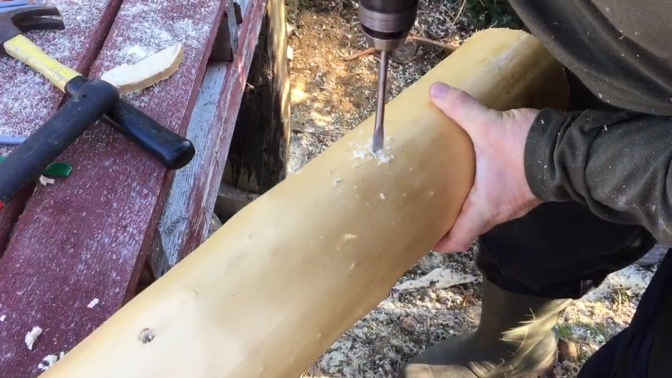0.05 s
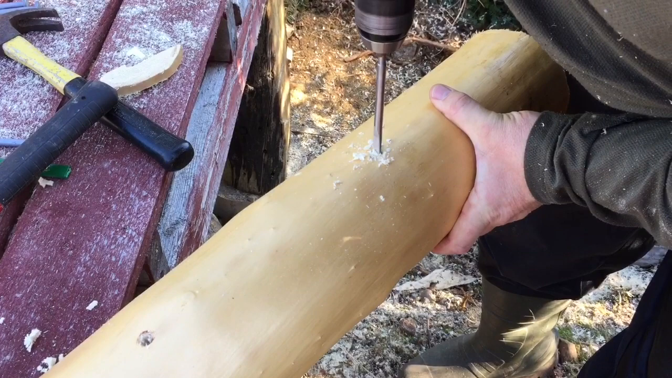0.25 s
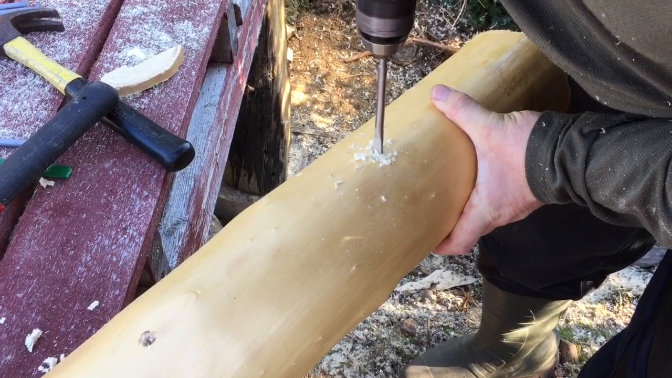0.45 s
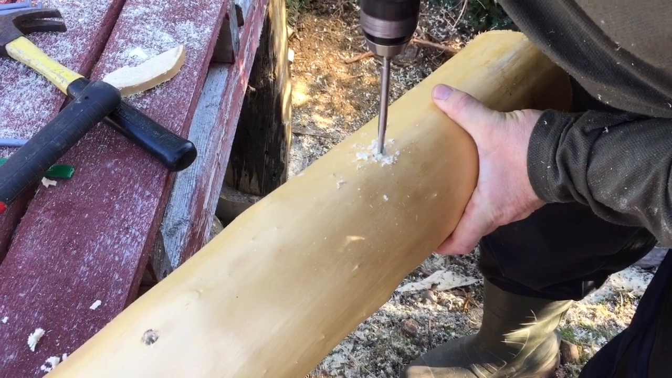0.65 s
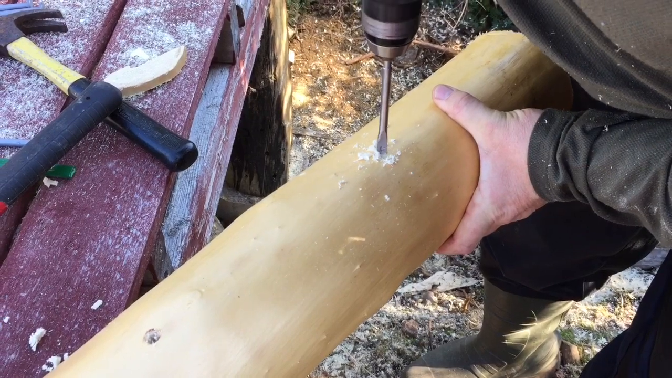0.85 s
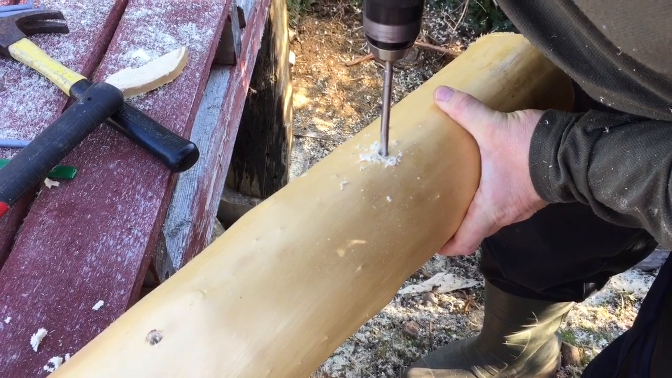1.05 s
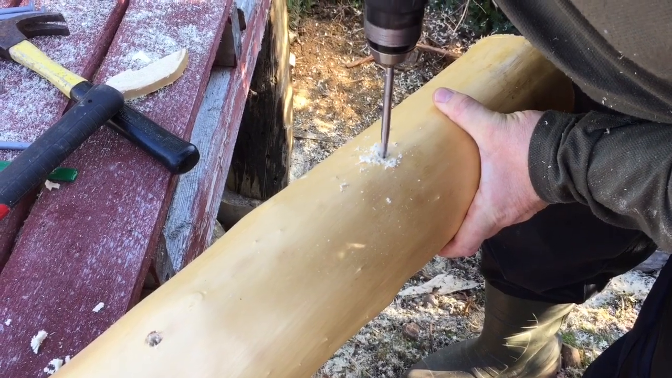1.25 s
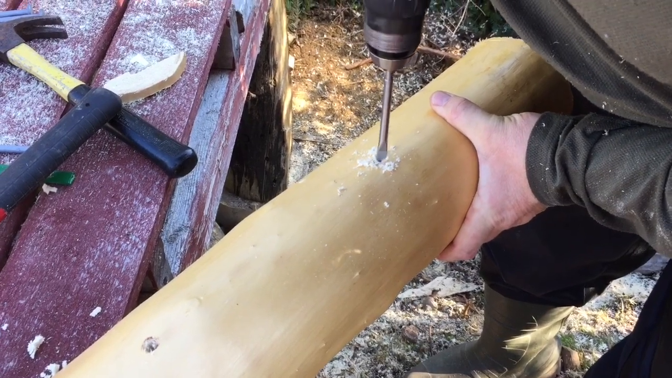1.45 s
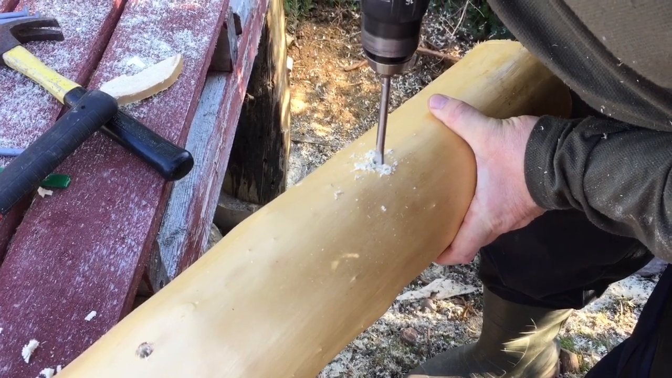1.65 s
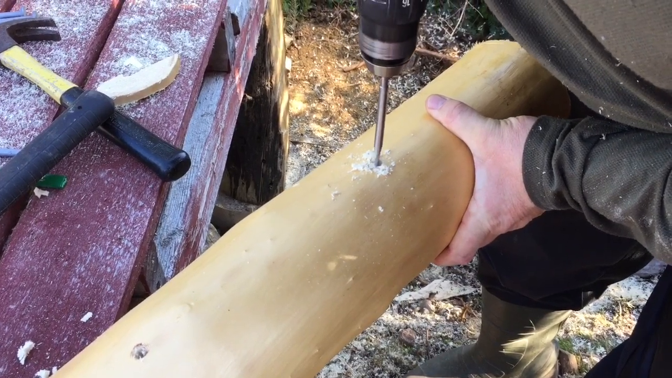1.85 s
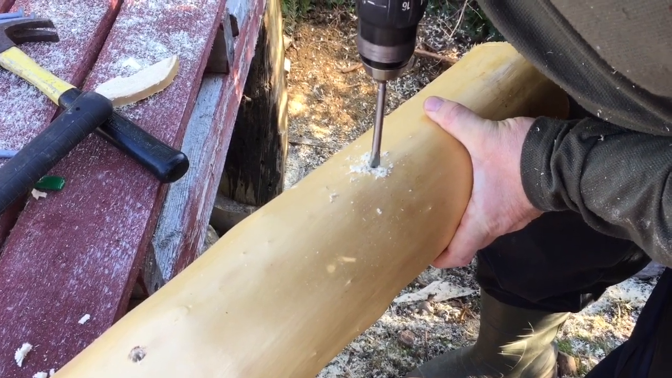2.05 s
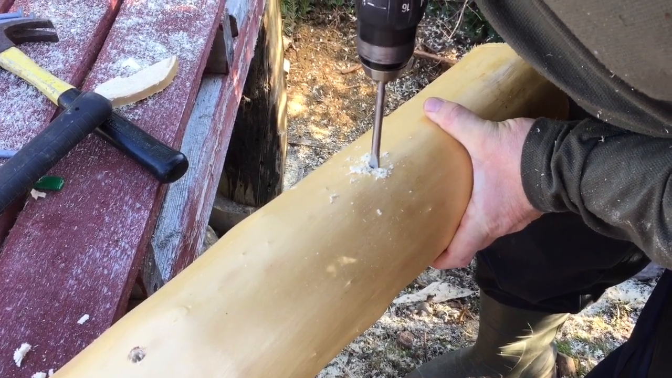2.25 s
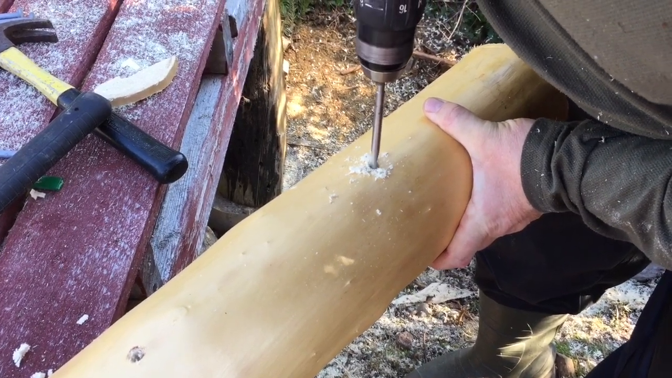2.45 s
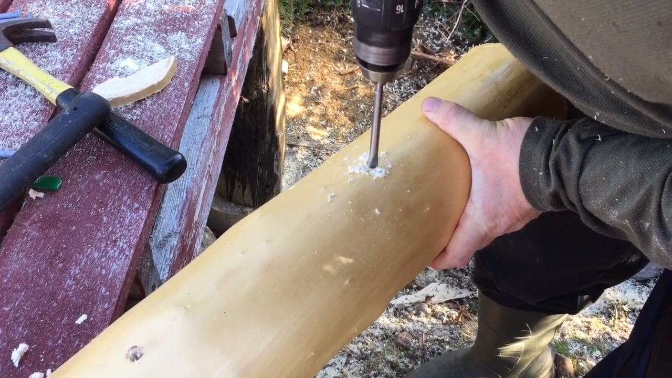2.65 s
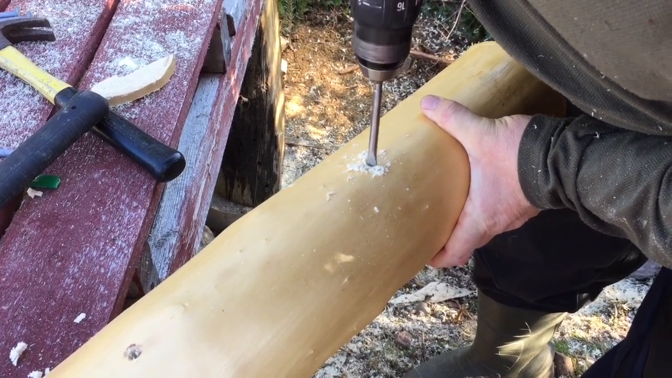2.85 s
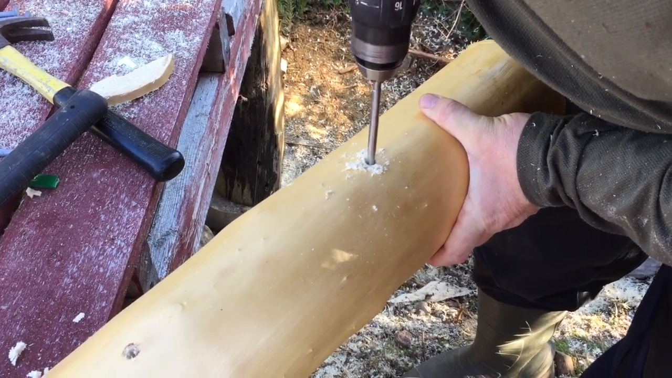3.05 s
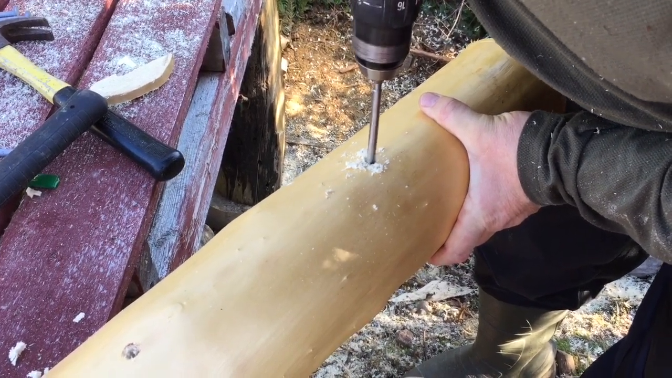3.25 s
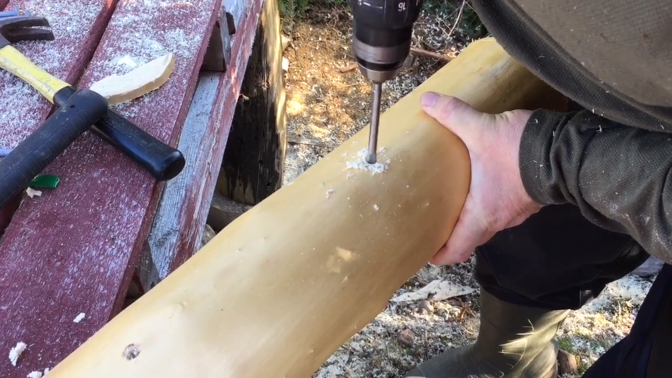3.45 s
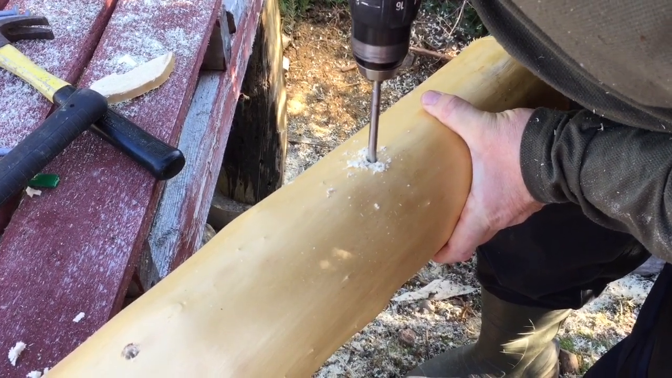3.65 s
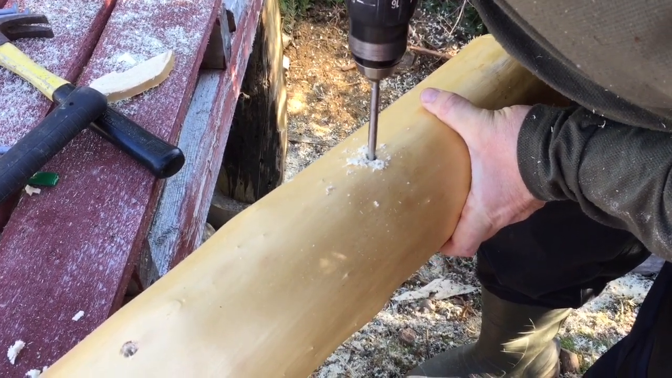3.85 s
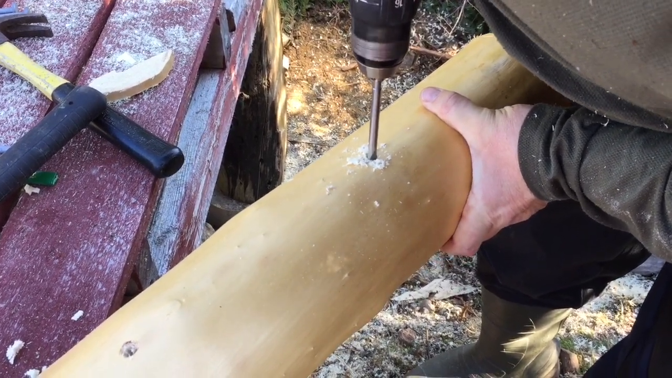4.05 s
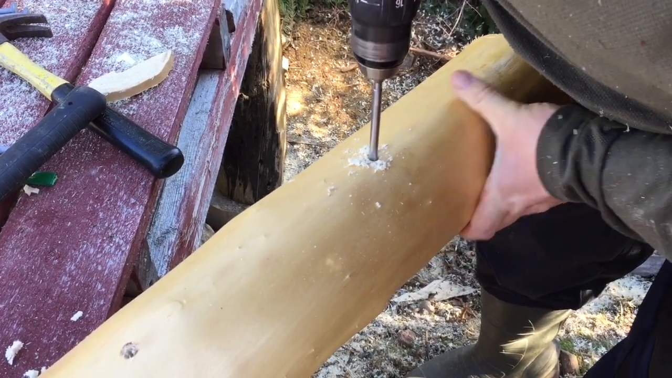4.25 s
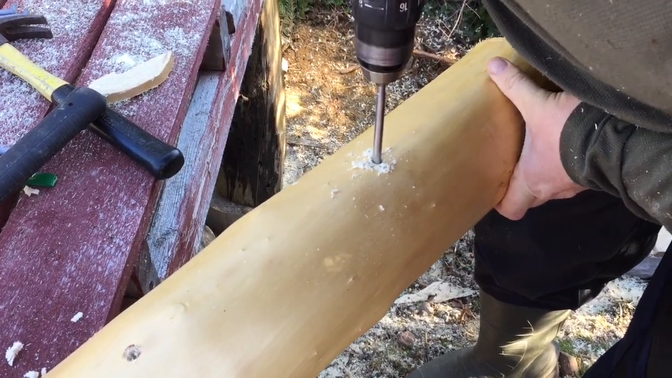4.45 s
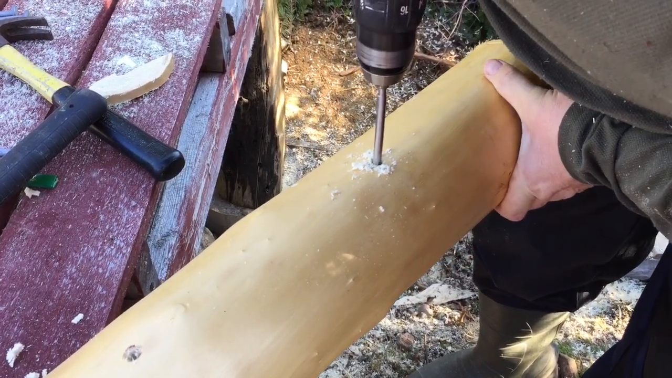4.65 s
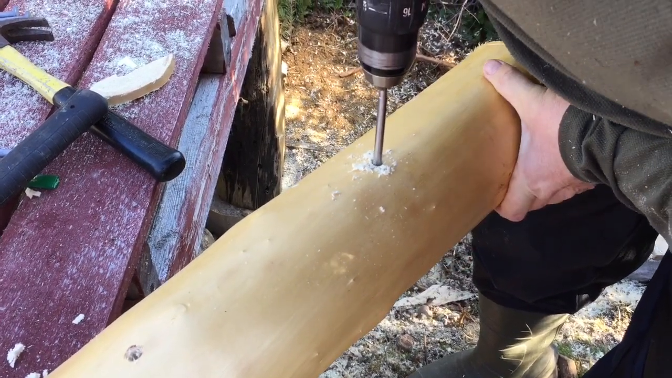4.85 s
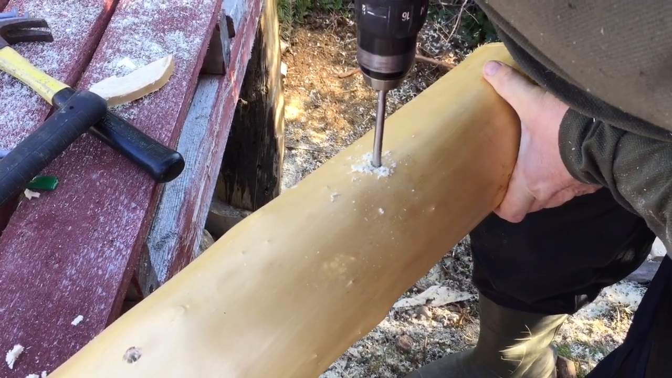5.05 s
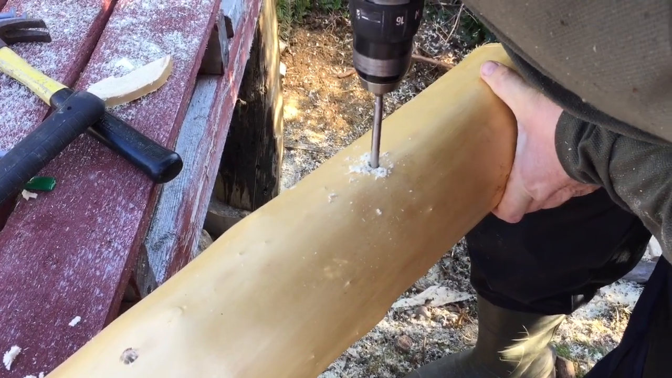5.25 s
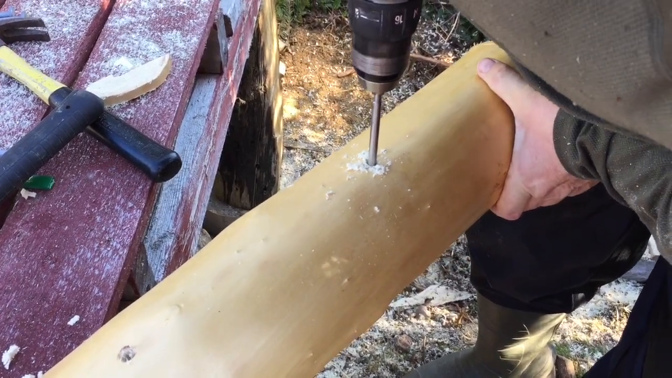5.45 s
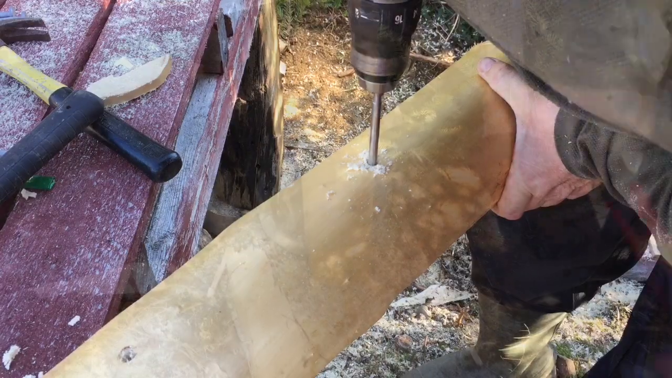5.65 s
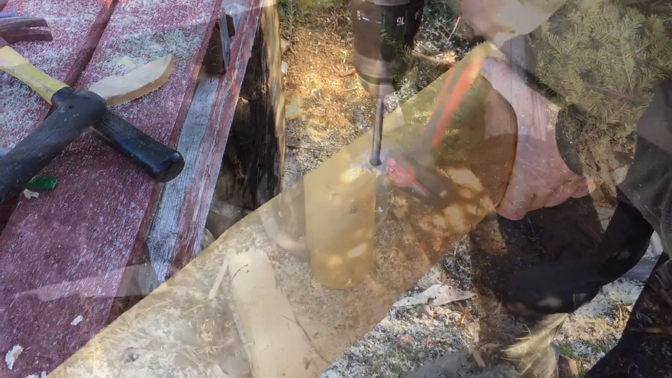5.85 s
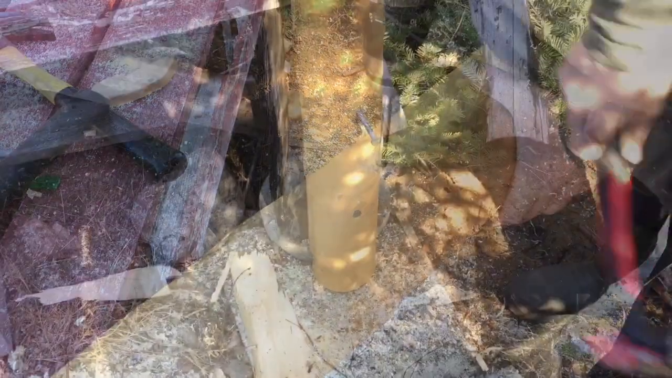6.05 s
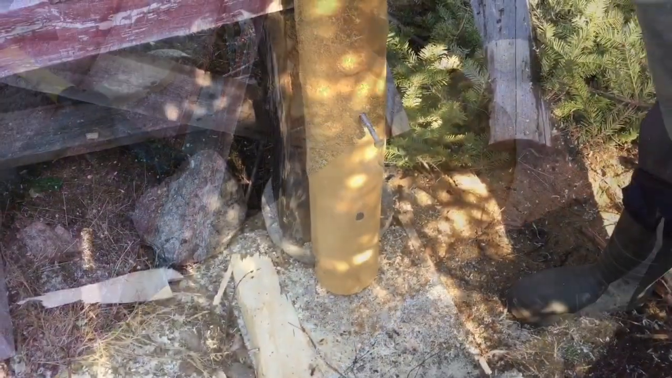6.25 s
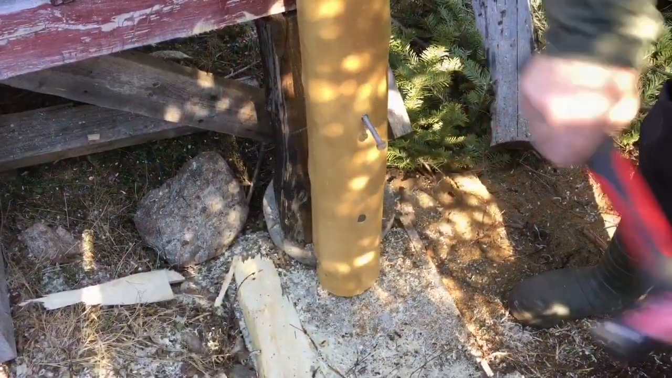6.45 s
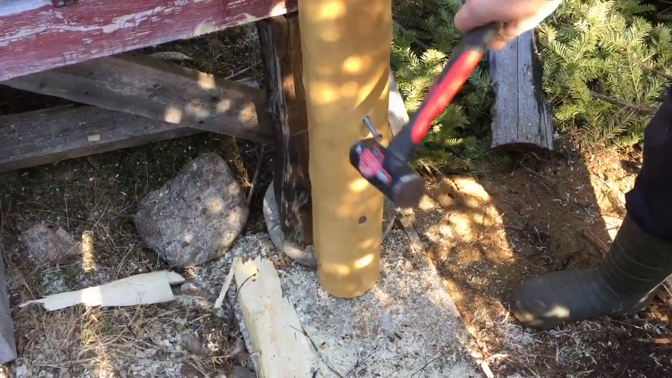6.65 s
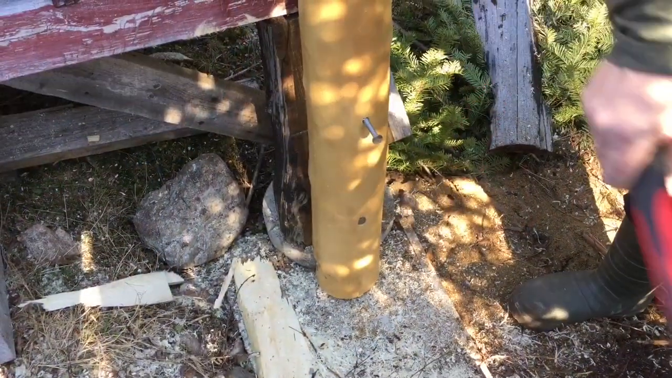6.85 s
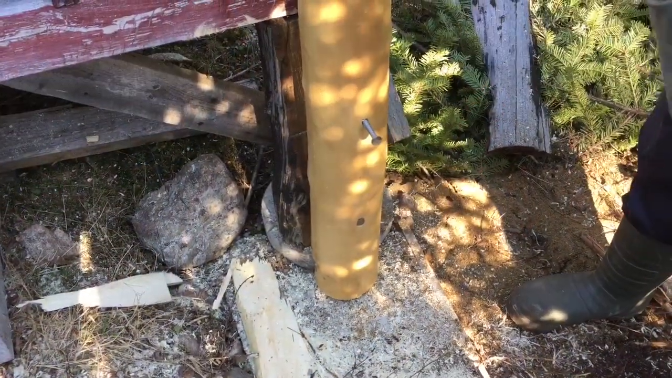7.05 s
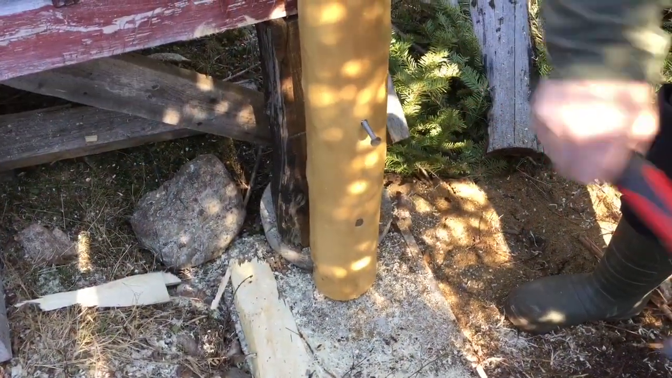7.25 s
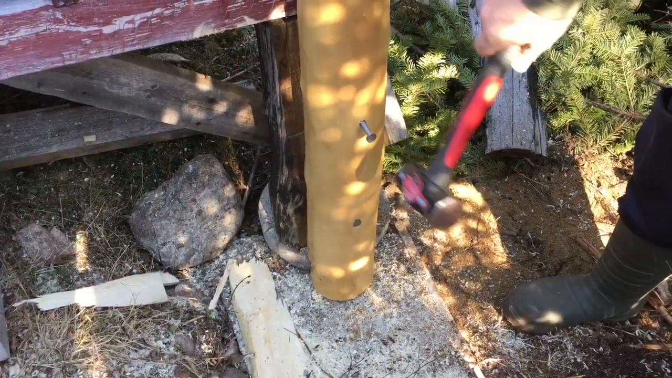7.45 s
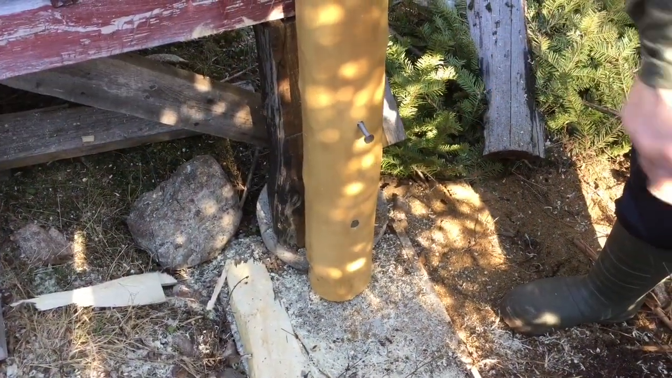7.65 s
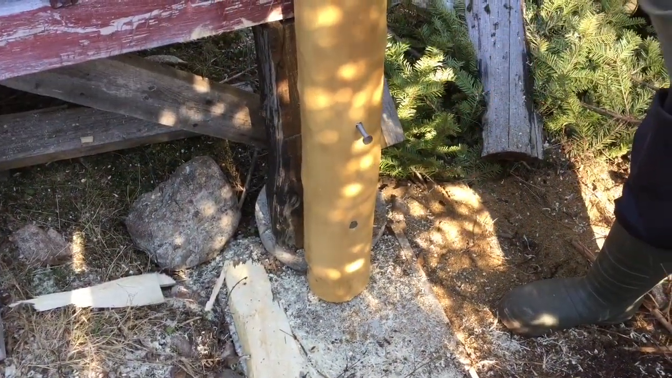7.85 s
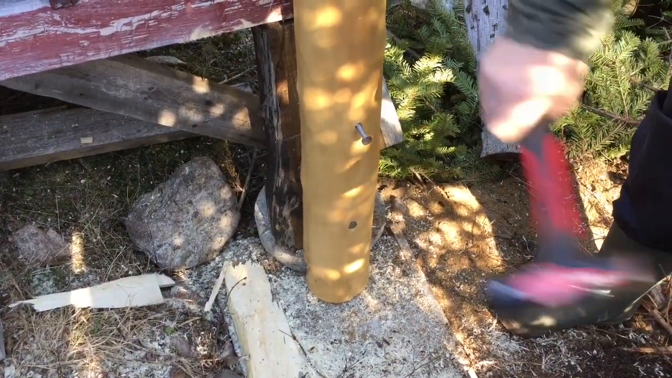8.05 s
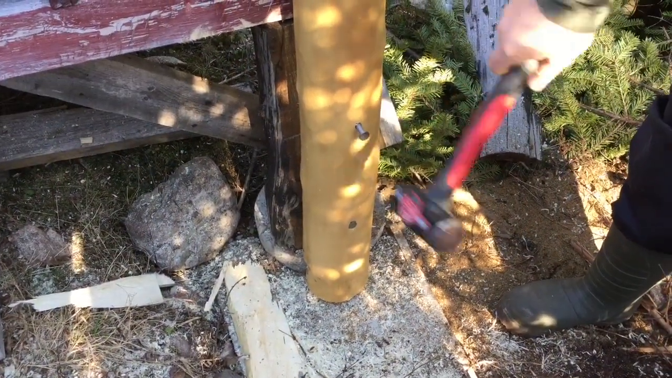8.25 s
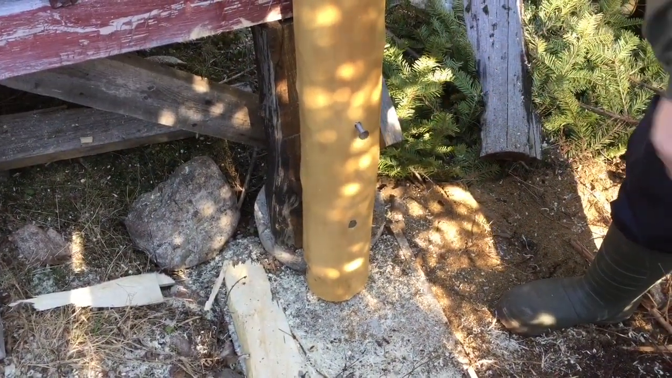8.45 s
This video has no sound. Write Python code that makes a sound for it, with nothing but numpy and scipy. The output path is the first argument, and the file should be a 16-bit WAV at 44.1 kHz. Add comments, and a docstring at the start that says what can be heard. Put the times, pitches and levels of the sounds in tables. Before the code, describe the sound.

An electric drill runs continuously, bright and whirring, its pitch sagging slightly as the hole deepens. Low wind buffets come early; later, chirping squeaks and bright rasps come in rapid bursts. It crossfades into slow, regular hammer blows on a spike in a pole, hard and overloading the close microphone, with short dry decays, soft open-air rush and slight cloth rustle.

```python
"""We first hear a cordless drill boring a wooden pole outdoors, with puffs of wind on the microphone. Rotor and
gear tones lie over brush and gear noise; deep in the hole the bit squeaks and rasps. The drill fades out as the
scene changes to a sledge hammer driving a steel spike into the standing pole: each blow is noise for the crack
plus dying tones for pole and spike. Shaped noise makes the distant rush and cloth. Sound that overloads the
microphone makes it turn its gain down for a while."""
import sys
import numpy as np
from scipy import signal
from scipy.fft import rfft, irfft, next_fast_len
from scipy.io import wavfile
from scipy.ndimage import uniform_filter1d

SR = 44100
rng = np.random.default_rng(int(sys.argv[2]) if len(sys.argv) > 2 else 0)


def int16_out(signal):
    """Quantize to a 16-bit WAV file."""
    q = np.round(np.clip(np.atleast_2d(signal).T, -1, 1) * 32767)
    wavfile.write(sys.argv[1], SR, q.astype(np.int16))


N = 375291
TIME = np.arange(N) / SR


def from_db(db):
    """Turn decibels into gain."""
    return 10 ** (np.asarray(db) / 20)


def rms_one(x):
    """Scale to an average strength (rms) of 1."""
    return x / np.sqrt(np.mean(x ** 2) + 1e-20)


def in_time(rows):
    """Join the rows of a table by straight lines in time, one curve per column."""
    s, *columns = np.transpose(rows)
    return [np.interp(TIME, s, column) for column in columns]


def at_hz(points, hz):
    """Read the columns of a spectrum table at any frequency, on a logarithmic frequency scale."""
    table_hz, *columns = np.transpose(points)
    return [np.interp(np.log(hz), np.log(table_hz), column) for column in columns]


def filtered(x, order, edges_hz, kind):
    """Pass a sound through a Butterworth filter, which keeps only part of its pitch range."""
    return signal.sosfilt(signal.butter(order, edges_hz, kind, fs=SR, output="sos"), x)


def drift(rate_hz):
    """Slow random wandering with spread 1: smoothed noise, made at every 40th sample."""
    r = np.exp(-2 * np.pi * rate_hz * 40 / SR)
    white = rng.standard_normal(N // 40 + 2002)
    slow = signal.lfilter([1], [1, -2 * r, r * r], white)[2000:]  # skip the filter's start
    return np.interp(np.arange(N) / 40, np.arange(len(slow)), rms_one(slow))


def bands(length):
    """Cut noise into third-octave bands, given as (centre Hz, noise)."""
    edges = 90 * 2 ** np.arange(0, 7.7, 1 / 3)
    white = rng.standard_normal((2, length))  # neighbouring bands use different noise
    for k, (low, high) in enumerate(zip(edges, edges[1:])):
        yield np.sqrt(low * high), filtered(white[k % 2], 2, [low, high], "band")


def coloured(spectrum, patchy_db, more=0):
    """Shape noise, each band flickering on its own, plus any extra sound by a spectrum; rms 1."""
    flickering = sum(from_db(patchy_db * drift(18)) * noise for hz, noise in bands(N))
    flat = rms_one(flickering) + more
    size = next_fast_len(N)
    gain = from_db(at_hz(spectrum, np.fft.rfftfreq(size, 1 / SR) + 1)[0])
    return rms_one(irfft(rfft(flat, size) * gain, size)[:N])


# tone colour of the distant rush: (frequency [Hz], relative level [dB per Hz])
AIR_SPECTRUM = [(59, -37), (100, -22.5), (166, -17.5), (228, -15), (479, -16.5), (830, -15), (1440, -7.5),
                (1850, -11), (2060, -12), (2770, -20), (6500, -34.5), (8000, -46.5), (15700, -57.5)]
# loudness of the distant rush: (time [s], level [dB])
RUSH_LEVEL = [(5.6, -73), (6.3, -61), (6.6, -50.5), (7.2, -51), (7.7, -49), (8.0, -48), (8.5, -49.5)]
# sleeve and boot shifting: (time of the middle [s], half length [s], level [dB])
CLOTH_RUSTLES = [(7.828, 0.011, -62), (7.864, 0.029, -57), (7.96, 0.12, -64)]


def surroundings():
    """Broad shaped noise is the distant rush; short swells of high noise are rustling clothes."""
    rush = from_db(in_time(RUSH_LEVEL)[0]) * coloured(AIR_SPECTRUM, patchy_db=-1.5)
    swells = sum(from_db(db) * np.exp(-((TIME - s) / half) ** 2) for s, half, db in CLOTH_RUSTLES)
    cloth = rms_one(filtered(rng.standard_normal(N), 2, [1800, 4500], "band"))
    return rush + swells * cloth * from_db(2.6 * drift(60))


# gusty low rumble of the wind: (time [s], level [dB])
WIND_RUMBLE = [(0, -45), (.3, -57), (.5, -45), (.75, -42), (.85, -78), (1.5, -78), (1.65, -47), (1.8, -76),
               (2.5, -58), (3.1, -61.5), (3.6, -75.5), (4.46, -60), (4.7, -72), (5.0, -60), (5.3, -52),
               (6.1, -46), (6.3, -63), (8.5, -57.5)]
# strong puffs on the microphone: (time of the middle [s], half length [s], level of the rumble [dB])
WIND_PUFFS = [(0.038, .01, -47), (0.15, 0.0088, -44), (0.334, 0.019, -44), (0.454, 0.023, -28),
              (0.658, .009, -27.5), (0.708, 0.012, -30.5), (.76, .009, -34), (1.575, .014, -46),
              (2.593, 0.021, -53), (5.358, .012, -39), (5.574, .013, -43), (5.712, 0.018, -43.5),
              (8.049, 0.0093, -51)]


def wind(lumpy_db=4.5):
    """Lumpy, gusty low noise, and puffs of evenly strong rumble; strong puffs reach higher in pitch."""
    low = filtered(rng.standard_normal(N), 3, [42, 120], "band")
    gusty = from_db(in_time(WIND_RUMBLE)[0]) * rms_one(low * from_db(lumpy_db * drift(6.76)))
    rumble = low / np.sqrt(uniform_filter1d(low ** 2, size=SR // 40))  # even out over 25 ms
    swells = sum(from_db(db) * np.exp(-((TIME - s) / half) ** 2) for s, half, db in WIND_PUFFS)
    puffs = rumble * swells
    # squaring the wave bends it, which adds overtones, most in strong puffs
    harsh = filtered(puffs * np.abs(puffs), 2, 90, "high")
    return gusty + puffs + 15 * harsh


# hammer on spike: (time [s], crack level [dB], crack brightness [dB per octave], then levels of
# the tones: thud of pole and ground [dB], hollow body [dB], knock of the wood [dB],
# upper knock [dB], steel [dB]); the highest tone follows the crack
HAMMER_BLOWS = [(5.9612, -16.5, 0, -15, -11, -13.5, -9.5, -23), (6.697, -4.5, 0.5, -2.5, -3, 4.5, 0.5, -1),
                (7.4748, -3, 0, 4.5, 7.5, -7, -2.5, 6.5), (8.2405, -1, 0.5, 3, 3.5, -0.5, 5.5, -1.5)]
# tones of pole and spike: (frequency [Hz], relative level [dB], time to fall by 60 dB [s])
POLE_TONES = [(64, -14.5, 0.22), (114, 6, 0.055), (187.7, -3.5, 0.087), (280, -18, 0.15),
              (377, -13.5, 0.054), (436, -15.5, 0.1), (610, -15, 0.16), (781, -15.5, 0.12), (945, -10, .13),
              (1445, -11.5, 0.067), (1760, -5, 0.05), (1890, -13.5, 0.088), (2060, -25, 0.16),
              (2340, -5.5, 0.032), (2480, -26.5, 0.11), (3500, -1.5, 0.018), (3767, -6.5, 0.026),
              (5415, -2, 0.02), (6170, -4, 0.024), (11300, -39, .22)]
# borders between the groups of tones, from thud to steel and the highest: frequency [Hz]
PART_EDGES_HZ = [250, 550, 1200, 3000, 8000]
# crack and its scatter from fence and trees: (frequency [Hz], relative crack level [dB],
# crack time to fall by 60 dB [s], relative scatter level [dB], scatter time to fall by 60 dB [s])
CRACK_BANDS = [(150, -12.5, 0.13, -19.5, 0.27), (507, -20, 0.032, -22, 0.22), (1200, -22, 0.1, -30.5, 0.28),
               (2440, 3.5, 0.022, -24, 0.2), (4000, -0.5, 0.027, -26.5, 0.22), (5900, 0, 0.011, -29, 0.21),
               (9050, -10.5, .025, -29, .12), (15000, -11.5, 0.03, -35, .12)]


def hammer(swell=0.73, after_db=-28, after_t60=0.11):
    """Each blow: a bright crack dying band by band, its scatter, and the tones of pole and spike."""
    out, length = np.zeros(N + SR), SR // 2
    t = np.arange(length) / SR
    for s, crack_db, bright_db, *parts_db in HAMMER_BLOWS:
        blow = np.zeros(length)
        for hz, noise in bands(length):
            db, t60, scatter_db, scatter_t60 = at_hz(CRACK_BANDS, hz)
            band_gain = from_db(crack_db + bright_db * np.log2(hz / 3000))
            dying = from_db(db - 60 * t / t60) + from_db(scatter_db - 60 * t / scatter_t60)
            blow += rms_one(noise) * band_gain * dying
        for hz, db, t60 in POLE_TONES:
            # the whole pole follows the spike a little later
            late = np.maximum(t - .0015 * (hz < PART_EDGES_HZ[0]), 0)
            part_db = [*parts_db, crack_db][np.searchsorted(PART_EDGES_HZ, hz)]
            strength = from_db(db + part_db + rng.normal(0, 1.2))
            dying = from_db(-60 * late / t60)
            if hz > PART_EDGES_HZ[-2]:  # the steel rings on faintly once the hammer has left it
                dying = dying + from_db(after_db - 60 * late / after_t60)
            onset = 1 - np.exp(-late * hz * swell)
            blow += strength * onset * dying * np.sin(2 * np.pi * hz * late)
        start = round(s * SR)
        out[start:start + length] += blow
    return out[:N]


FADE_FROM_S, FADE_TO_S = 5.59, 6.548


def fade():
    """Gain of the drill and all that it stirs: a straight line down to silence."""
    return np.clip((FADE_TO_S - TIME) / (FADE_TO_S - FADE_FROM_S), 0, 1)


TURNS_PER_BIND = 30  # rotor turns until the next lip of the bit binds
FIRST_BIND_S = 3.799  # middle of the first bind


def binds():
    """Count of binds so far, whole at the middle of each; the bit is geared to the rotor."""
    turns = np.cumsum(in_time(MOTOR_SPEED)[0]) / SR
    return (turns - np.interp(FIRST_BIND_S, TIME, turns)) / TURNS_PER_BIND


def small_squeaks(db=-35, follow=0.36, spread_db=3.5, second_db=-4, count=300):
    """Many fainter slips, bunched where a lip binds and louder with the grip; rows as in LOUD_SLIPS."""
    u, g = rng.random((count, 5)), rng.standard_normal((count, 2))
    bind = np.floor(31 * np.sqrt(u[:, 0]))  # more often as the hole deepens
    s = np.interp(bind + .6 * u[:, 4] - .3, binds(), TIME)
    length = 0.0058 + 0.0106 * u[:, 1]
    first_hz = 3300 + 2600 * u[:, 2] ** 3
    last_hz = first_hz * (0.98 + 0.09 * u[:, 3])
    grip_db = np.interp(s, *np.transpose(BIND_GRIP))
    mean_db = db + follow * (grip_db - grip_db.mean())
    levels = mean_db[:, None] + spread_db * g + [0, second_db]
    return np.column_stack([s, length, first_hz, last_hz, levels])


BIND_SHARE = 0.56  # share of the time that a lip binds
OVERTONE_STEP_DB = -7.5  # each partial above the second, under the one before
# loud slips of the bit on the wall of the hole, before flutter and fade: (time [s], length [s],
# first frequency [Hz], last frequency [Hz], level [dB], second partial level [dB])
LOUD_SLIPS = [(3.892, 0.025, 3217, 3720, -27, -36), (4.318, 0.021, 4020, 3950, -21, -31),
              (4.335, 0.021, 5130, 6700, -20.5, -42), (4.407, 0.037, 3600, 4130, -27, -40),
              (4.495, 0.043, 5340, 6440, -23.5, -35), (4.522, 0.02, 3470, 4167, -26, -37),
              (4.555, 0.014, 4400, 4420, -38, -30), (4.595, .019, 3800, 4100, -34, -34),
              (4.77, 0.019, 3560, 4100, -28, -42), (4.876, 0.011, 3584, 3583, -20.5, -40),
              (4.985, 0.043, 3650, 4320, -31, -35), (5.103, 0.062, 3835, 4550, -33, -33),
              (5.2, 0.038, 3008, 3353, -35, -27), (5.26, .013, 4400, 4410, -37, -27),
              (5.449, 0.036, 3520, 3520, -27, -32), (5.47, 0.037, 4014, 4120, -36, -27),
              (5.535, .049, 5160, 5890, -25, -42), (5.634, 0.039, 3432, 4450, -31, -29),
              (5.716, 0.056, 5106, 6520, -21, -43), (5.783, .031, 3760, 3350, -21.5, -36),
              (5.81, 0.033, 3900, 4300, -24, -29), (5.948, 0.04, 3826, 3598, -16.5, -40),
              (6.002, 0.034, 4010, 4414, -29, -37), (6.1, 0.022, 5450, 5500, -17.5, -38),
              (6.181, 0.054, 3600, 3600, -23.5, -45), (6.275, .04, 3410, 4500, -26, -35),
              (6.362, .052, 3830, 4590, -26, -26.5), (6.435, .06, 3760, 5280, -17.5, -29),
              (6.52, 0.042, 4230, 4200, -14, -29)]
# grip of the hole on the bit, as the rasp of each bind before the fade: (time [s], level [dB])
BIND_GRIP = [(3.7, -50), (3.85, -37), (4.15, -54), (4.23, -28), (4.6, -31), (5.0, -36.5), (5.25, -32),
             (5.6, -23.5), (5.9, -27.5), (6.5, -29)]


def squeaks(unsteady=0.022, flutter_db=3.5, patchy_db=5.5, uneven_db=-0.5):
    """Each slip is a gliding, unsteady tone with overtones; each bind a puff of bright, patchy rasp."""
    out = np.zeros(N)
    shake, flutter = 1 + unsteady * drift(90), from_db(flutter_db * drift(180))
    white, rasp = rng.standard_normal(N), np.zeros(N)
    for k, low in enumerate(range(7000, 16000, 1500)):
        patches = from_db(patchy_db * drift(60) + 0.48 * k)
        rasp += patches * filtered(white, 2, [low, low + 1500], "band")
    rasp = rms_one(rasp)
    for s, length, first_hz, last_hz, db, second_db in [*LOUD_SLIPS, *small_squeaks()]:
        at = slice(round(s * SR), round((s + max(length, .005)) * SR))
        along = np.linspace(0, 1, at.stop - at.start)
        glide_hz = first_hz + (last_hz - first_hz) * along ** 1.8
        phase = 2 * np.pi * np.cumsum(glide_hz * shake[at]) / SR
        partials_db = [db, *(second_db + OVERTONE_STEP_DB * np.arange(3))]
        tone = np.zeros(len(along))
        for k, partial_db in enumerate(partials_db, start=1):
            if k * last_hz < SR / 2.2:  # leave out partials too high for the sample rate
                tone += from_db(partial_db) * np.sqrt(2) * np.sin(k * phase)
        out[at] += np.sin(np.pi * along) ** .5 * flutter[at] * tone
    off_middle = (binds() + .5) % 1 - .5  # distance from the nearest bind's middle
    puffs = np.cos(np.pi * np.clip(off_middle / BIND_SHARE, -.5, .5))
    grip = from_db(in_time(BIND_GRIP)[0] + uneven_db * drift(8))
    return fade() * (out + puffs * grip * rasp)


def repeating(turns, memory=0.61, size=256):
    """Rattle that partly repeats from one turn to the next, so it heaps up around the rotor orders."""
    fresh = rng.standard_normal((int(turns[-1]) + 2, size))  # one row per turn
    kept = signal.lfilter([1], [1, -np.clip(memory, 0, .95)], fresh, axis=0).ravel()
    return rms_one(np.interp(turns * size, np.arange(kept.size), kept))


MESH_TEETH, PLANET_RATIO = 15, 45 / 16  # gear tones, as multiples of the rotor turns
WHIRR_DB = -23  # whirr level before throb, rise and fade
LOUDER_DB_PER_S = 0.1234  # the drill labours harder as the hole deepens
# drill, before rise and fade: (time [s], rotor turns [Hz], gear mesh tone level [dB])
MOTOR_SPEED = [(0, 355.2, -29.5), (.55, 355.3, -29.5), (.9, 352.7, -26.5), (1.26, 349.7, -26),
               (1.44, 347.3, -27.5), (1.9, 345.1, -29.5), (2.6, 348.1, -27), (3.06, 344.7, -24),
               (3.42, 341, -24), (3.96, 342, -23), (4.14, 339.2, -23.5), (4.5, 341.3, -25),
               (4.86, 344.2, -25), (5.04, 341.4, -25), (5.22, 341.2, -24.5), (5.55, 336, -26),
               (5.9, 331, -31.5), (6.05, 329, -28), (6.25, 337.2, -21.5), (6.45, 349.3, -30),
               (6.6, 359.4, -13)]
# tones as multiples of the rotor turns, one for each row of ROTOR_TONES: order [per turn]
ROTOR_ORDERS = [*range(1, 12), 13, 14, *range(16, 21), 27, 28, 29, 30, 34, 40, 42]
# moments of shallow, halfway and deep boring: time [s]
DEPTH_TIMES = (0.52, 2, 4.4)
# each rotor order, before waver, rise and fade: (shallow level [dB], halfway level [dB], deep level [dB])
ROTOR_TONES = [(-49, -49, -52), (-39, -39.5, -42), (-33.5, -33, -34.5), (-35.5, -39.5, -38),
               (-34.5, -32.5, -36.5), (-35, -33, -34), (-46.5, -53.5, -63.5), (-39.0, -42.5, -36.5),
               (-48, -56, -47), (-30.5, -38, -44), (-43, -47, -40), (-35, -35.5, -67), (-32, -56, -72),
               (-32, -63.5, -39.5), (-60.5, -64, -46.5), (-35.5, -33, -54), (-39, -43, -55),
               (-40, -57.5, -60), (-45, -41, -51), (-47.5, -40.5, -47), (-52, -46, -58.5),
               (-40, -34.5, -37), (-50, -67, -66), (-45, -40, -46), (-51, -56, -59)]
# tones 3 to 8 of the planet gear, likewise: (shallow level [dB], halfway level [dB], deep level [dB])
PLANET_TONES = [(-54, -55, -45), (-42, -33, -43), (-40, -42.5, -42), (-45.5, -36.5, -50), (-54, -45, -49.5),
                (-50, -45, -64)]
# tone colour of brush, fan and gear noise: (frequency [Hz], relative level [dB per Hz])
WHIRR_SPECTRUM = [(140, -51), (210, -17), (400, -17.5), (700, -16.5), (950, -5), (1700, 2.5), (2300, -1.5),
                  (3000, -3.5), (4300, -4), (5900, 1), (6600, -8.5), (8000, -12), (10200, -13),
                  (10800, -15), (15800, -19.5)]


def drill(waver_db=1.0, throb=0.34, wobble=.0004, rattle_db=-8.0, grain_db=0.5):
    """Tones locked to the wobbling rotor, and grainy noise that throbs once a turn."""
    turn_hz, mesh_db = in_time(MOTOR_SPEED)
    turns = np.cumsum(turn_hz * (1 + wobble * drift(16.1))) / SR
    angle = 2 * np.pi * turns
    out = from_db(mesh_db + 0.2 * drift(20)) * np.sqrt(2) * np.sin(MESH_TEETH * angle)
    orders = [*ROTOR_ORDERS, *(PLANET_RATIO * np.arange(3, 9))]
    for order, *depth_db in np.column_stack([orders, [*ROTOR_TONES, *PLANET_TONES]]):
        db = np.interp(TIME, DEPTH_TIMES, depth_db) + waver_db * drift(19.0)
        # gear play blurs the tones between the mesh tone and its octave
        play = .003 * order ** 2 * drift(45) if 15 < order < 30 else 0
        start_angle = rng.uniform(0, 2 * np.pi)
        out += from_db(db) * np.sqrt(2) * np.sin(order * angle + play + start_angle)
    rattle = from_db(rattle_db) * repeating(turns)
    whirr = coloured(WHIRR_SPECTRUM, patchy_db=0.85, more=rattle)
    out += from_db(WHIRR_DB + grain_db * drift(150)) * whirr * (1 + throb * np.sin(angle))
    return out * from_db(LOUDER_DB_PER_S * TIME) * fade()


def scene():
    """Add up all sources, the same in both channels."""
    return np.tile(surroundings() + wind() + hammer() + squeaks() + drill(), (2, 1))


DUCK_DB, RECOVER_DB_PER_S = 5, 20.5  # gain cut at an overload, and how fast it creeps back
CUTOFF_HZ = 15900


def record(dry):
    """Overload ducks the gain, which then creeps back; peaks clip flat; the top is cut."""
    rise = RECOVER_DB_PER_S * TIME
    overload = np.abs(dry[0]) > 1
    cut_db = np.maximum(np.maximum.accumulate(DUCK_DB * overload + rise) - rise, 0)
    r = np.exp(-1 / (0.06 * SR))  # the gain follows smoothly, within about 0.06 s
    cut_db = signal.lfilter([1 - r], [1, -r], cut_db)
    clipped = np.clip(dry * from_db(-cut_db), -1, 1)
    return signal.sosfilt(signal.ellip(12, .3, 60, CUTOFF_HZ, fs=SR, output="sos"), clipped)


dry = scene()
out = record(dry)
int16_out(out)
```